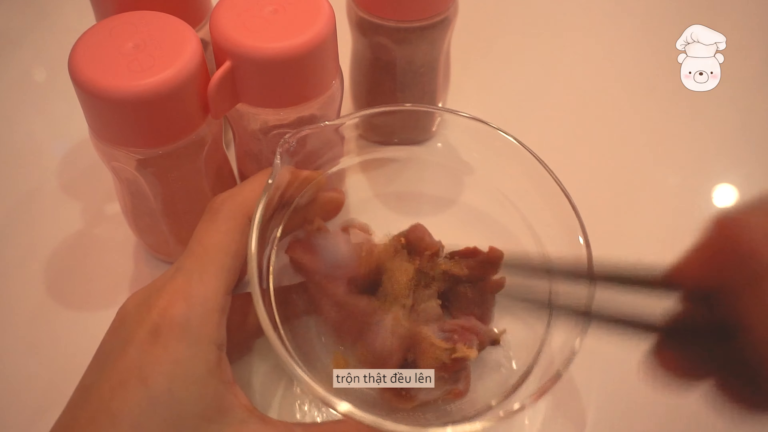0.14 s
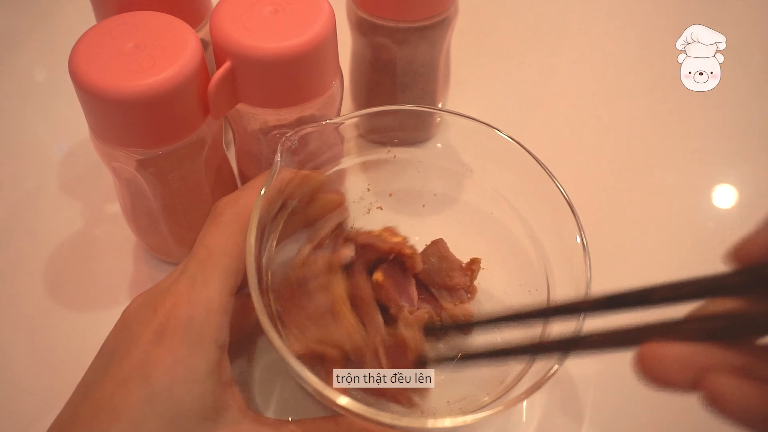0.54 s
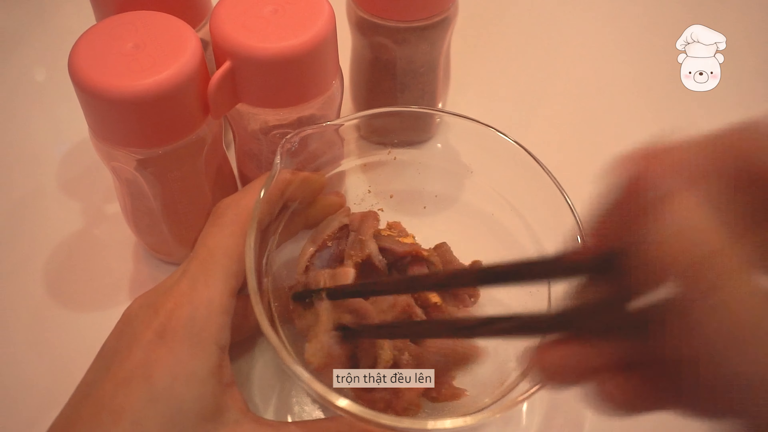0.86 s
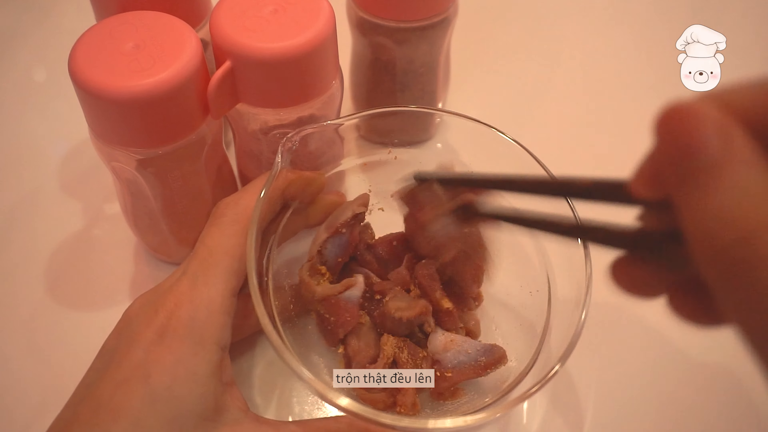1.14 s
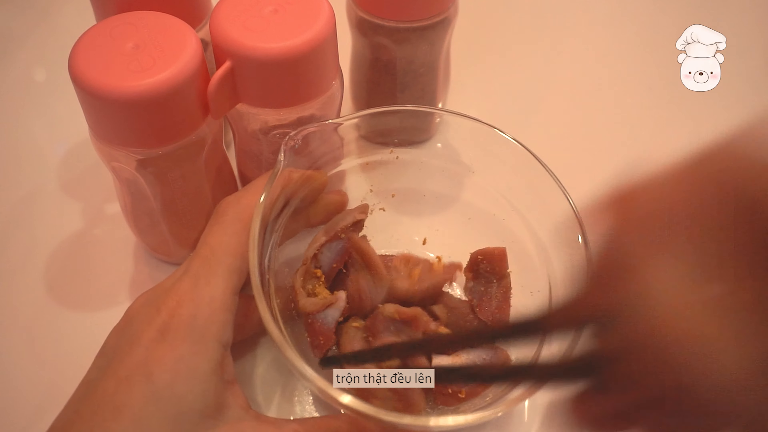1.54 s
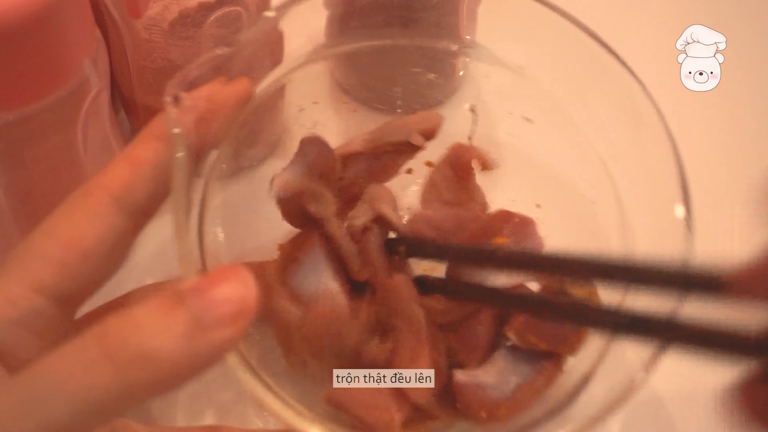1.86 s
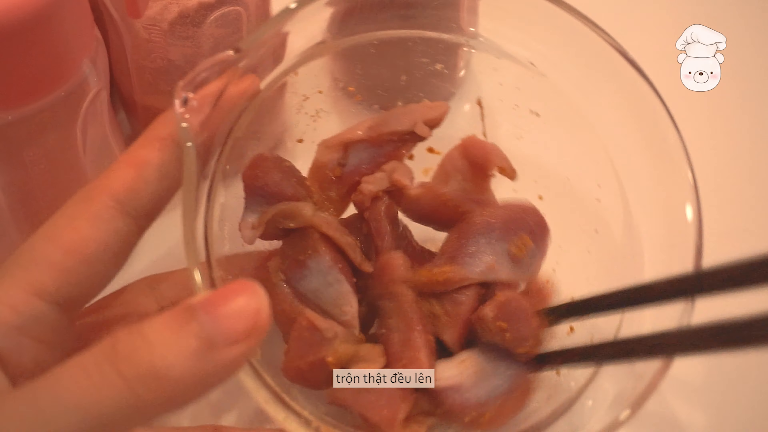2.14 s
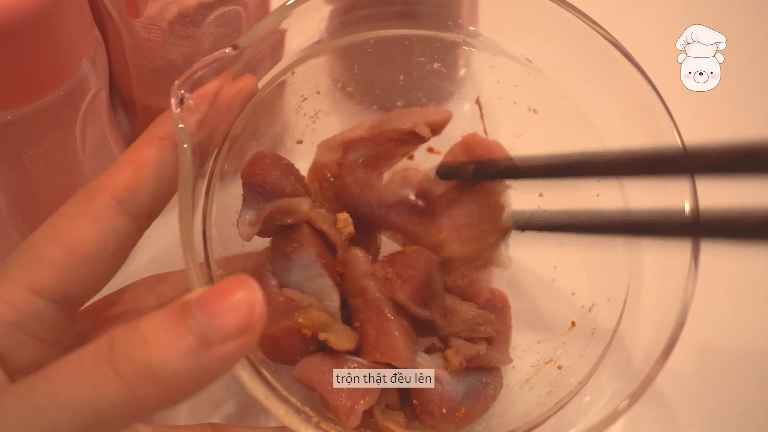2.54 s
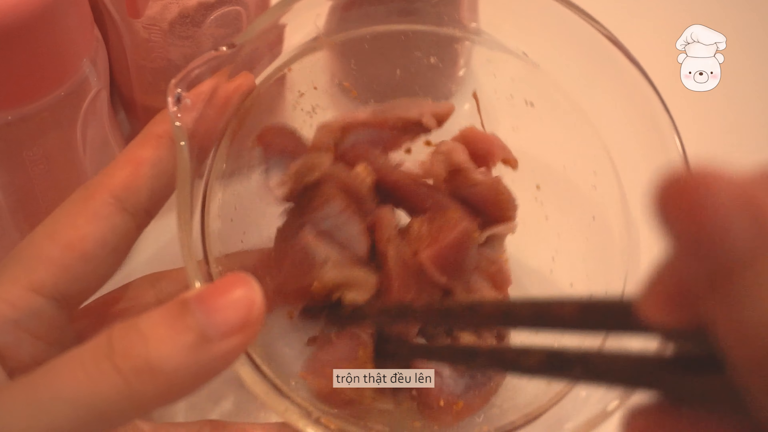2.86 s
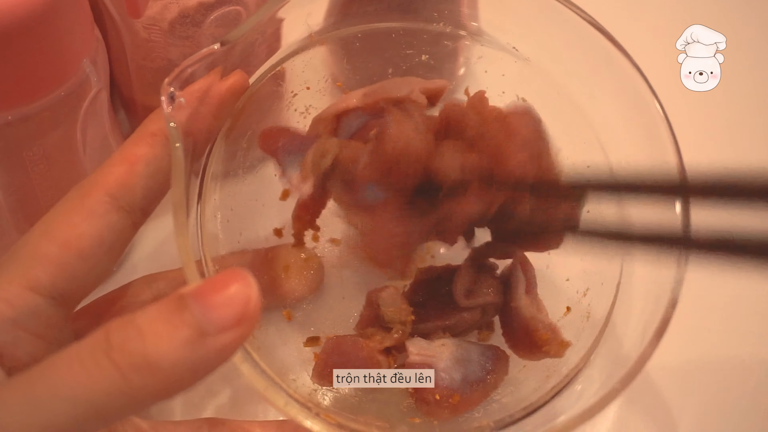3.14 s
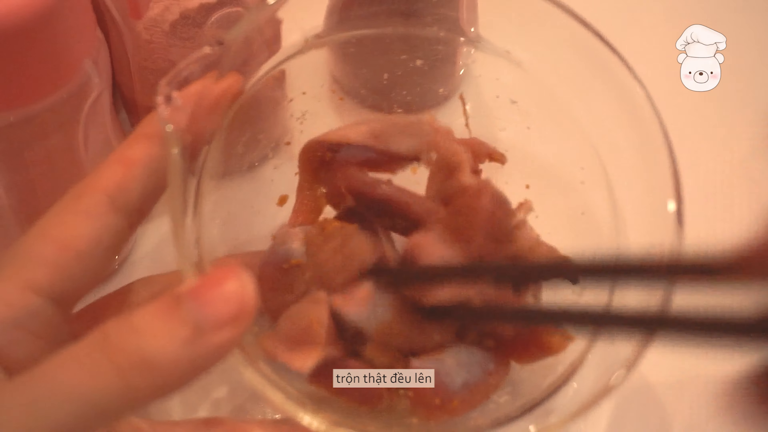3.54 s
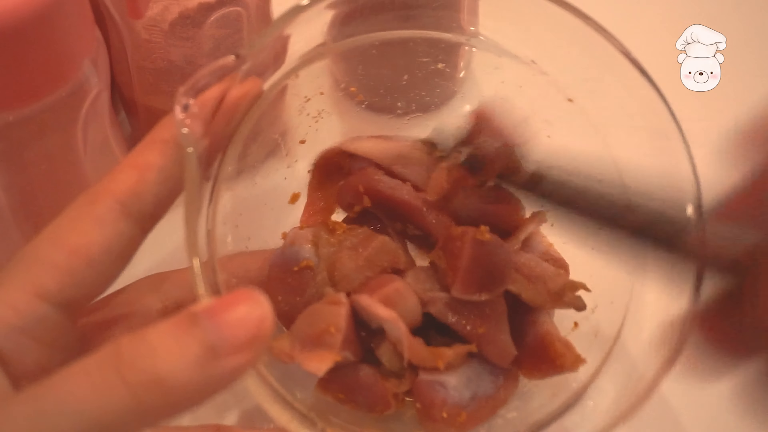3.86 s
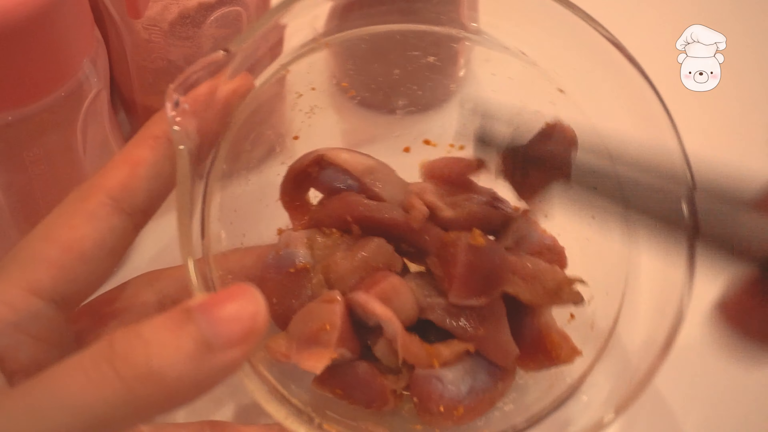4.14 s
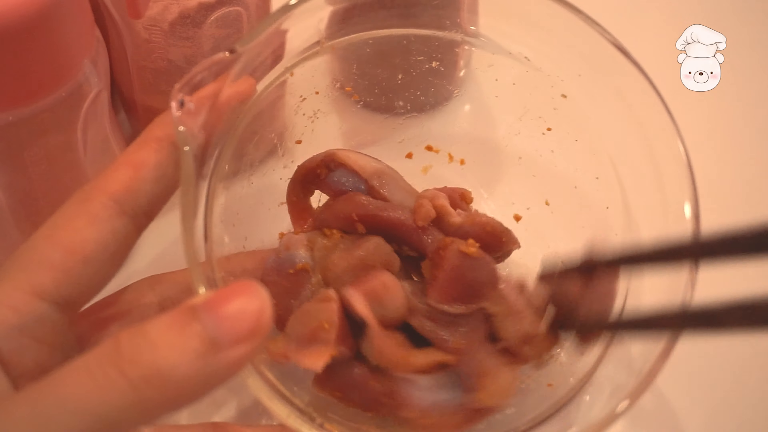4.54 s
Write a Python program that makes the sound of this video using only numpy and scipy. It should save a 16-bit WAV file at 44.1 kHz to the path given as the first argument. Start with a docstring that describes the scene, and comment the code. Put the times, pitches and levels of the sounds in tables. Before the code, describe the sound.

Faint hiss and a thin electrical whine fill a small, hard-walled kitchen. Close to the microphone, seasoned raw meat parts with thin, sticky smacks as chopsticks mix it in a glass bowl. Scattered glassy taps and soft knocks join in, each with a short echo. A single sharp wooden clack stands out, then several lighter knocks and taps follow as the wet sounds die away.

```python
"""Chopsticks turn raw meat in a hand-held glass bowl on a kitchen counter, heard close.
Air noise and a thin electrical whine run throughout. From the start, wet films tear in tiny smacks.
From 1.2 s the tips tap the glass and the sticks and bowl knock softly; a small hard room rings after
each blow. One hard knock lands at 4.7 s. Lighter blows follow until 6.0 s, a last smack at 6.3 s."""
import sys
import numpy as np
from scipy import signal
from scipy.fft import rfft, irfft
from scipy.io import wavfile
from scipy.ndimage import uniform_filter1d

SR = 44100
rng = np.random.default_rng(int(sys.argv[2]) if len(sys.argv) > 2 else 0)


def output_pcm(signal):
    """Save a mono or channel-first signal as 16-bit PCM at the path in sys.argv[1].

    Samples are clipped to [-1, 1] before scaling.
    """
    pcm = np.clip(np.atleast_2d(signal).T, -1, 1) * 32767
    wavfile.write(sys.argv[1], SR, np.round(pcm).astype(np.int16))


N = 313582
RING_SAMPLES = 16384
T = np.arange(RING_SAMPLES) / SR

# room air and microphone hiss: (frequency [Hz], relative density [dB])
AIR_SPECTRUM = [(25, -23.5), (50, -19.5), (72, -21.5), (125, -18), (170, -5), (230, -4), (310, 0.5),
                (800, -2), (1300, -6), (2500, -12), (5000, -15), (9000, -17), (11000, -19.5)]
# left-right likeness of the air noise: (frequency [Hz], correlation [-1..1])
AIR_CORRELATION = [(50, 0.9), (180, 0.94), (350, 0.69), (630, 0.42), (1130, 0.17), (2500, -0.043),
                   (6500, -0.04)]
# electrical whine: (frequency [Hz], level [dB], left minus right [dB])
WHINE_TONES = [(301, -82, 2), (1194.5, -76.7, 12), (1253, -85, 10), (9825, -94, 10), (9879, -94, 10),
               (9938, -89.5, 12), (9996, -91.5, 10), (10110, -91, 6), (10168, -91.5, 10), (10282, -85.5, 2)]
# clearest smacks of parting meat: (time [s], level [dB], pitch [Hz])
CLEAR_SMACKS = [(0.1179, -44.5, 7040), (0.1368, -44, 3300), (.196, -50, 10100), (0.264, -51, 9800),
                (.7437, -54, 10000), (1.411, -45, 7760), (1.8465, -44.5, 10000), (1.8594, -48.5, 9800),
                (2.281, -46, 10450), (2.959, -42.5, 7150), (2.9585, -43.5, 3900), (2.9742, -43.5, 10200),
                (3.9667, -51, 10200), (4.785, -47.5, 7400), (4.8423, -48.5, 9800), (5.097, -50.5, 10000),
                (5.5255, -46, 10460), (6.331, -51, 10600)]
# bowl wall: (frequency [Hz], peak [dB], t60 [s], dependence on a rim blow [0..1])
GLASS_MODES = [(825, -4, .055, 0), (882, 1.5, .07, 0), (2126, 4, .04, 1), (2880, -1, .014, .6),
               (3898, 5, .06, .2), (4565, -10, .03, 1), (5957, 6, .038, 1)]
# bowl base on the counter: (frequency [Hz], peak [dB], t60 [s])
BASE_MODES = [(1328, 6, .032), (1525, -8, .06)]
# stick bending: (frequency [Hz], peak [dB], t60 [s])
STICK_MODES = [(2680, -2, .009), (3050, -4, .004)]
# dry contact of a tip: (frequency [Hz], level [dB])
TICK_SPECTRUM = [(300, -16), (800, -34), (1300, -7.5), (2200, -24), (2600, -5.5), (3100, -15), (3550, -12),
                 (4300, -7.5), (5200, -18.5), (7000, -49), (11000, -5.5)]
# dry contact of a knock: (frequency [Hz], level [dB])
CLACK_SPECTRUM = [(250, -65.5), (600, -35.5), (820, -13), (1030, -18), (1280, -6), (1680, 0), (1940, -3),
                  (2200, -25), (2430, -16.5), (2660, -9.5), (3100, -15.5), (3500, -23), (4450, -23),
                  (4900, -38.5), (11000, -35.5)]
# tips on glass: (time [s], level [dB], contact cut-off [Hz], rim ring [dB], left minus right [dB])
TIP_TAPS = [(1.2029, -8, 9500, 3.5, 3), (2.0950, -5.5, 6800, -18, 0.5), (2.7588, -20.5, 7000, -33, 0),
            (3.7956, -12, 5900, -17, 1), (4.2060, -28, 7000, -24, -1), (5.2850, -9, 800, -32, -3),
            (6.0049, -9, 2280, -33, -0.5)]
# knocks of sticks and bowl: (time [s], level [dB], stick ring [dB], base ring [dB], glass ring [dB],
# shift from near scatter to room tail [dB], left minus right [dB])
BOWL_KNOCKS = [(1.609, -23.5, 0, -17, -19, -7, 4), (1.6390, -28, -8, -14, -12, -6, 2),
               (2.759, -26.5, -26, 17.5, -5, 5, -2), (3.4090, -29, -21, 8, 11, 8, 1),
               (4.204, -35, -20, 14, -13, -9, 2), (4.7402, 17, 5, 8, -38, 1, 3),
               (5.3220, -6, -17, -35, 1, -2, -2), (5.6306, -8.5, -10, -24, -2, -0.5, -1),
               (6.046, -9, 4.5, -23, -0.5, -0.5, 5.5)]

STIR_END_S = 5.6
GRAIN_LOW_HZ, GRAIN_HIGH_HZ = 6017, 11300


def gain(db):
    """Decibels to amplitude."""
    return 10 ** (np.asarray(db) / 20)


def pan(pan_db):
    """Stereo gain column from left minus right."""
    return gain(np.array([[pan_db], [-pan_db]]) / 2)


def curve(points, size):
    """(Hz, value) points interpolated over log frequency onto FFT bins."""
    hz, value = np.transpose(points)
    bins_hz = np.arange(size // 2 + 1) * SR / size
    return np.interp(np.log(np.maximum(bins_hz, 1)), np.log(hz), value)


def add(out, time_s, sound):
    """Mix a sound in at time_s."""
    start = max(int(time_s * SR), 0)
    out[:, start:start + sound.shape[-1]] += sound[..., :max(N - start, 0)]


def drift(rate_hz):
    """Smooth random curve, spread near 1."""
    step = int(SR / rate_hz)
    return uniform_filter1d(np.repeat(rng.standard_normal(N // step + 1), step), step)[:N]


def soften(x, hz):
    """Low-pass: a softer contact pushes longer and loses treble."""
    return signal.sosfilt(signal.butter(2, hz, fs=SR, output="sos"), x)


def radiate(x, hz):
    """High-pass: a small object radiates little bass."""
    return signal.sosfilt(signal.butter(4, hz, "highpass", fs=SR, output="sos"), x)


def impact(spectrum):
    """Minimum-phase click with the given spectrum."""
    cepstrum = irfft(np.log(gain(curve(spectrum, RING_SAMPLES))))
    cepstrum[1:RING_SAMPLES // 2] *= 2
    cepstrum[RING_SAMPLES // 2 + 1:] = 0
    return irfft(np.exp(rfft(cepstrum)))


def chatter(x, share, skid_s, size=512):
    """A dense burst of tiny slips follows the first contact."""
    burst = rng.standard_normal(size) * np.exp(-T[:size] / skid_s)
    burst *= share / np.linalg.norm(burst)
    burst[0] += 1
    return signal.fftconvolve(x, burst / np.hypot(1, share))[:len(x)]


def mode(hz, peak_db, t60_s):
    """Damped tone, scaled by its resonance peak."""
    decay_per_s = np.log(1000) / t60_s
    return gain(peak_db) * 2 * decay_per_s / SR * np.exp(-decay_per_s * T) * np.cos(2 * np.pi * hz * T)


def ring(x, modes):
    """Response of modes driven by x."""
    return signal.fftconvolve(x, sum(mode(*row) for row in modes))[:len(x)]


def air(level_db=-65, pan_db=1.7):
    """Steady room noise, alike on both sides in the bass, under uncorrelated hiss."""
    alike = curve(AIR_CORRELATION, N)
    spectra = rfft(rng.standard_normal((2, N))) * gain(curve(AIR_SPECTRUM, N))
    mid, side = spectra * np.sqrt([1 + alike, 1 - alike])
    noise = irfft(np.array([mid + side, mid - side]), N)
    return noise / noise.std() * gain(level_db) * pan(pan_db)


def whine(waver_hz=2.2, waver_db=0.5):
    """Thin electrical tones, wavering slightly in pitch and level."""
    out = np.zeros((2, N))
    for hz, db, pan_db in WHINE_TONES:
        phase = 2 * np.pi * np.cumsum(hz + waver_hz * drift(rate_hz=16)) / SR
        out += np.sqrt(2) * np.sin(phase) * gain(db + waver_db * drift(rate_hz=10)) * pan(pan_db)
    return out


def kitchen(x, near_db, near_s, near_hz, tail_db, bloom_s, low_t60_s, high_t60_s):
    """Counter and jars scatter at once; the walls answer later and hold the lows longer."""
    near, tail = rng.standard_normal((2, 2, RING_SAMPLES))
    near = soften(near, near_hz) * (T > 0.0018) * np.exp(-T / near_s)
    low = soften(tail, hz=2347)
    tail = low * gain(-60 * T / low_t60_s) + (tail - low) * gain(-60 * T / high_t60_s)
    tail *= 1 - np.exp(-(T / bloom_s) ** 2)
    echo = sum(gain(db) * part / np.linalg.norm(part, axis=1, keepdims=True)
               for db, part in ((near_db, near), (tail_db, tail)))
    return x + signal.fftconvolve(x, echo, axes=1)[:, :x.shape[1]]


def bubbles(count=7, centre_hz=6370, scatter_hz=200, level_db=-62.5, decay_s=0.0023):
    """Air bubbles of nearly one size ring briefly in the marinade."""
    out = np.zeros((2, N))
    for when, size in rng.random((count, 2)):
        hz = centre_hz + scatter_hz * (1 - 2 * size)
        add(out, when * STIR_END_S, gain(level_db) * np.exp(-T / decay_s) * np.sin(2 * np.pi * hz * T))
    return out


def smack(hz, decay_s=0.00029, size=512):
    """A wet film tears: a few cycles of a tiny cavity, smaller snaps right behind."""
    t = T[:size]
    cavity = np.exp(-t / decay_s) * np.sin(2 * np.pi * hz * t)
    return 2 * chatter(cavity, share=0.92, skid_s=0.0012)


def crackle(count=260, floor_db=-67.5, spread_db=3):
    """Tiny films tear at random during stirring; most are faint, few loud."""
    out = np.zeros((2, N))
    for when, rank, pitch in rng.random((count, 3)):
        db = floor_db - spread_db * np.log(max(rank, 0.015))
        hz = GRAIN_LOW_HZ + pitch * (GRAIN_HIGH_HZ - GRAIN_LOW_HZ)
        add(out, when * STIR_END_S, gain(db) * smack(hz))
    return out


def partings(threads=2, max_wait_s=0.073, thread_db=-16):
    """Pieces part with a clear smack; the last threads snap a moment later."""
    out = np.zeros((2, N))
    for time_s, db, hz in CLEAR_SMACKS:
        add(out, time_s, gain(db) * smack(hz))
        for wait, pitch in rng.random((threads, 2)):
            thread_hz = GRAIN_LOW_HZ + pitch * (GRAIN_HIGH_HZ - GRAIN_LOW_HZ)
            add(out, time_s + wait * max_wait_s, gain(db + thread_db) * smack(thread_hz))
    return out


def meat():
    """All wet sounds in the room, thin and slightly left."""
    wet = radiate(partings() + crackle() + bubbles(), hz=4200) * pan(4.0)
    return kitchen(wet, near_db=-7, near_s=0.004, near_hz=12000,
                   tail_db=-1, bloom_s=0.012, low_t60_s=0.3, high_t60_s=0.2)


def glass(rim_db):
    """The bowl's ring, damped by hand and meat."""
    modes = sum(mode(hz, db + rim * rim_db, t60_s) for hz, db, t60_s, rim in GLASS_MODES)
    return radiate(modes, hz=550)


def taps():
    """A tip ticks on the glass and rings the bowl; each spot has its own echoes."""
    out = np.zeros((2, N))
    tick = radiate(impact(TICK_SPECTRUM), hz=610)
    for time_s, db, contact_hz, rim_db, pan_db in TIP_TAPS:
        body = chatter(tick, share=0.24, skid_s=0.0029) + glass(rim_db)
        tap = gain(db) * pan(pan_db) * soften(body, contact_hz)
        add(out, time_s, kitchen(tap, near_db=-6.5, near_s=0.002, near_hz=9300,
                                 tail_db=-2, bloom_s=0.0081, low_t60_s=0.35, high_t60_s=0.25))
    return out


def knocks():
    """A woody clack drives the sticks and the bowl's base; the glass wall rings along."""
    out = np.zeros((2, N))
    clack = soften(radiate(impact(CLACK_SPECTRUM), hz=500), hz=7010)
    stick, base = ring(clack, STICK_MODES), ring(clack, BASE_MODES)
    wall = soften(glass(rim_db=-22), hz=1991)
    for time_s, db, stick_db, base_db, glass_db, room_db, pan_db in BOWL_KNOCKS:
        body = clack + gain(stick_db) * stick + gain(base_db) * base + gain(glass_db) * wall
        knock = gain(db) * pan(pan_db) * body
        add(out, time_s, kitchen(knock, near_db=-14.5 - room_db, near_s=0.009, near_hz=2700,
                                 tail_db=room_db - 8, bloom_s=0.02, low_t60_s=0.36, high_t60_s=0.24))
    return out


def scene():
    """Blows and smacks over the steady background."""
    return taps() + knocks() + meat() + air() + whine()


def record(dry, port_hz=10150, port_width_hz=800, port_db=4, cutoff_hz=11100):
    """The microphone port rings in the high treble; a steep low-pass cuts just above."""
    port = signal.lfilter(*signal.iirpeak(port_hz, port_hz / port_width_hz, fs=SR), dry)
    lowpass = signal.ellip(10, 0.2, 70, cutoff_hz, fs=SR, output="sos")
    return signal.sosfilt(lowpass, dry + gain(port_db) * port)


dry = scene()
out = record(dry)
output_pcm(out)
```